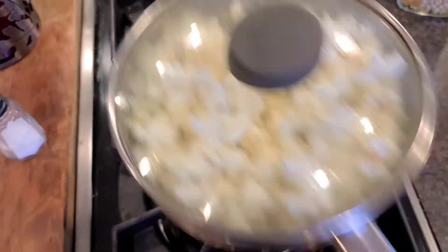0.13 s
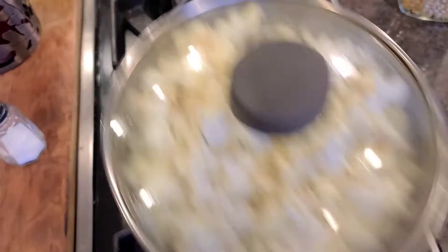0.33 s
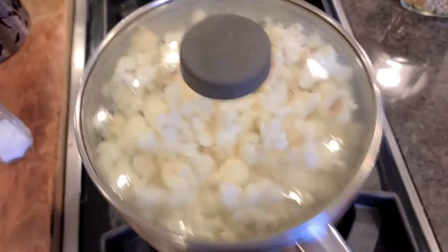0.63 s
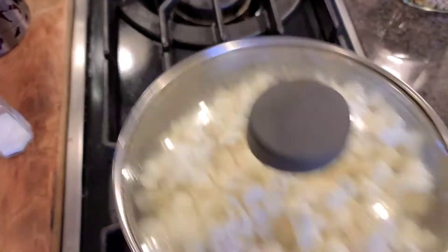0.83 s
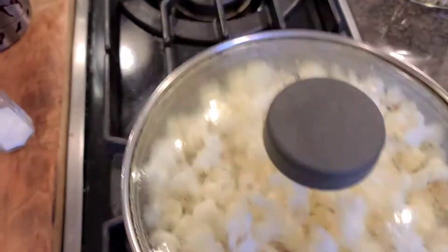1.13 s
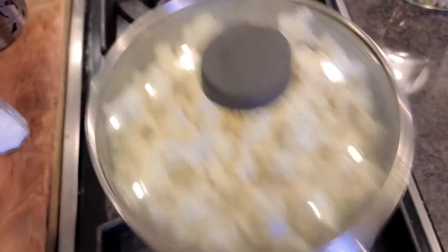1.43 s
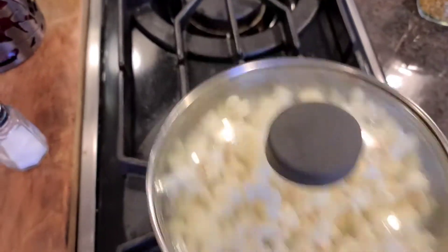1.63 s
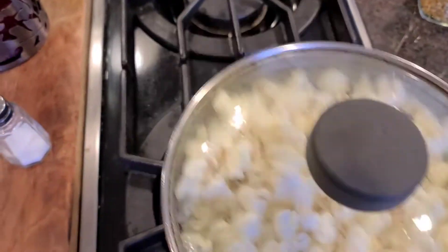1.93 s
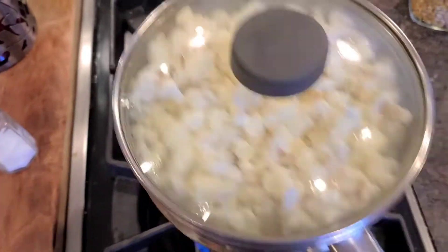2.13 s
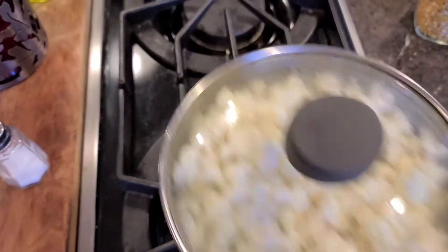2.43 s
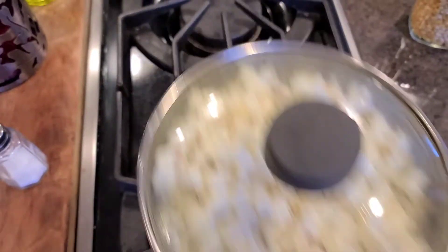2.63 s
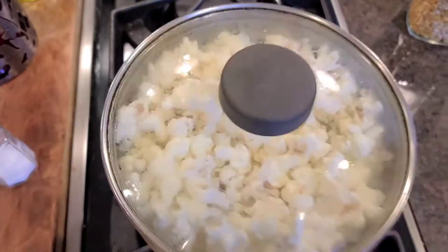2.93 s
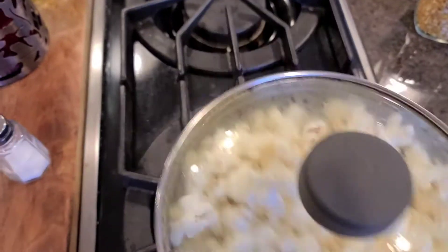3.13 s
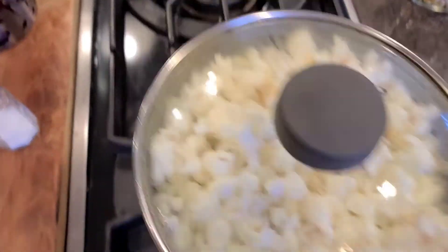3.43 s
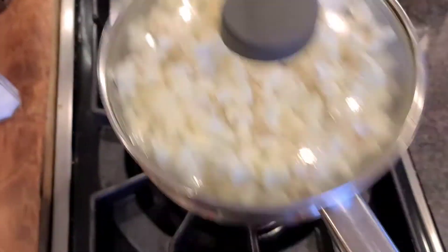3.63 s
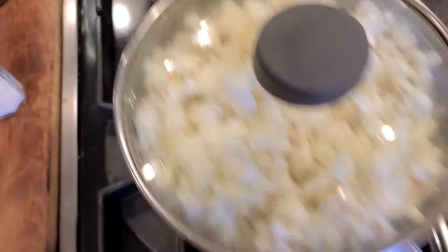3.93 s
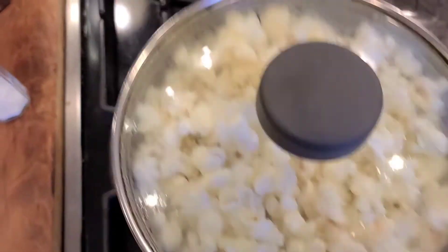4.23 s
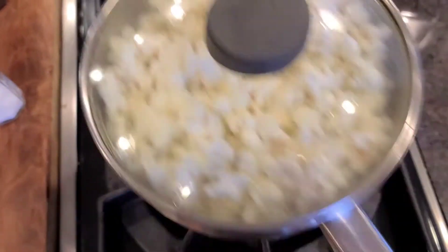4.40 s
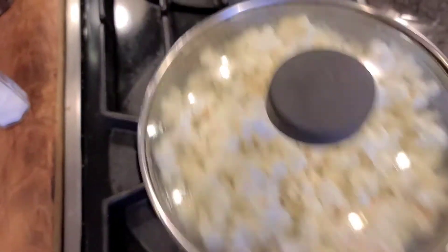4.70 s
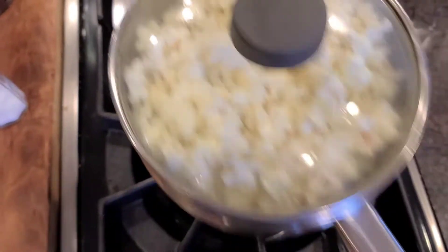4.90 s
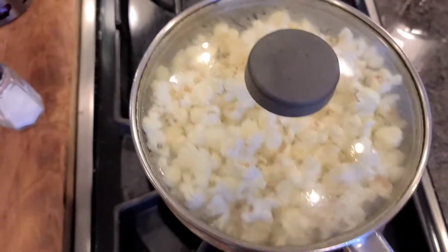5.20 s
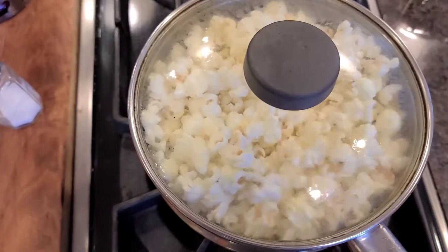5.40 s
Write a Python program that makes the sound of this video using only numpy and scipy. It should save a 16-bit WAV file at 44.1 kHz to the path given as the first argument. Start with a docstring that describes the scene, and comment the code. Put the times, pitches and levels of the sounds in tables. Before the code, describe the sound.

From the start, a steel pot is shaken to and fro on an iron stove grate in a quick, nearly even rhythm of about five knocks a second. Each stroke is a short scrape into a ringing metal clatter, with a hollow boom from the stove top. A loose glass lid clinks just before every second knock, growing softer over time. Popcorn kernels burst irregularly among the knocks with sharp cracks and small thumps, thickest and loudest between 1 and 1.7 seconds, sparser later. Oil sizzles faintly, swelling at about 0.3 seconds and again around 2.1 seconds, when a thin hiss of steam escapes. The shaking ends just after 5 seconds. A few last kernels pop until about 5.4 seconds, one pinging brightly on the pot wall. A gas flame rushes quietly throughout. Everything sounds close, with the short reverberation of a small kitchen.

```python
"""Shaking popcorn on a gas stove

A steel pot is shaken to and fro on an iron grate. About five times a second it scrapes, knocks and
rings, and the stove top booms; the loose glass lid clinks just before every second knock. Kernels
crack and thump in between, oil sizzles, steam slips out, the burner rushes and a small kitchen answers.
"""
import sys
import numpy as np
from scipy import signal
from scipy.fft import rfft, irfft
from scipy.io import wavfile
from scipy.ndimage import uniform_filter1d

SR = 44100
rng = np.random.default_rng(int(sys.argv[2]) if len(sys.argv) > 2 else 0)


def to_wav(s):
    """Save 16-bit WAV."""
    ch = np.atleast_2d(s).T  # columns
    pcm = np.round(np.clip(ch, -1, 1) * 32767)  # PCM
    wavfile.write(sys.argv[1], SR, pcm.astype(np.int16))


N = 245061
BLOW = np.arange(12288) / SR  # time within one blow [s]
RELEASE = 1 - (BLOW / BLOW[-1]) ** 4  # smooth end for a blow
SIDES = np.array([[.5], [-.5]])  # splits a difference between left and right

# pot hitting the grate: (time [s], clatter [dB], boom [dB], t60 [s], contact resonance [Hz])
KNOCKS = [(0.0304, -15.5, -24, 0.1, 1820), (0.254, -15.5, -21.5, 0.12, 2760),
          (0.4425, -14.5, -25.5, 0.1, 2950), (0.6505, -14, -17, 0.13, 2780),
          (0.814, -16, -17.5, 0.13, 1650), (1.006, -15, -16, 0.14, 2800), (1.1715, -16.5, -19, 0.17, 2130),
          (1.388, -15.5, -20.5, 0.13, 2740), (1.576, -17.5, -31, 0.2, 2770),
          (1.7996, -14, -19, 0.077, 2830), (1.9921, -15, -28, 0.065, 2020), (2.1971, -15, -23, .12, 3470),
          (2.3652, -18, -21.5, 0.15, 930), (2.576, -16, -17.5, 0.11, 1500), (2.7606, -14, -26.5, .1, 2040),
          (2.966, -15.5, -16.5, .12, 2740), (3.1362, -14.5, -19.5, 0.16, 2500),
          (3.342, -16.5, -17, 0.15, 1600), (3.511, -14, -16.5, 0.18, 3650), (3.724, -16, -18, .11, 2840),
          (3.897, -14, -21.5, .11, 2220), (4.1067, -15.5, -19, .11, 1435), (4.2738, -18, -18.5, 0.15, 1940),
          (4.4851, -15, -21, .15, 2740), (4.6662, -18.5, -25, 0.1, 1965), (4.8795, -16.5, -20.5, .12, 2800),
          (5.0557, -13, -17.5, 0.089, 1960)]
# modes of the glass lid: (frequency [Hz], level [dB], t60 [s])
LID_MODES = [(1400, -20, 0.25), (1745, -0.5, 0.095), (1664, -6.5, 0.14), (2613, -11, 0.24),
             (2728, -4.5, 0.089), (3320, -6, 0.12), (6250, -26, 0.11)]
# modes of the stove top: (frequency [Hz], level [dB], t60 [s])
STOVE_MODES = [(179.6, -9, 0.093), (219.6, -3, 0.1), (267.8, -8, 0.16), (324.6, -3.5, 0.11),
               (410.2, -8.5, 0.086)]
# how alike left and right are: (frequency [Hz], coherence [0-1])
COHERENCE = [(100, .98), (350, .96), (600, .7), (1200, .5), (5000, .45), (14000, .3)]


def knocks():
    """The pot slides, hits the grate and rebounds: clatter, ringing steel and a stove-top boom."""
    # modes of the steel pot: (frequency [Hz], level [dB], t60 [s])
    pot_modes = [(1710, -26, 0.2), (2090, -13.5, 0.2), (2073, -20.5, 0.29), (2640, -23.5, 0.53),
                 (2700, -14, 0.13), (2670, -29, 0.67), (2660, -18, 0.2), (3653, -2.5, 0.043),
                 (5990, -11, 0.091), (6080, -10.5, 0.12), (7100, -17.5, 0.11)]
    # tone of steel on iron: (frequency [Hz], relative level [dB])
    colour = [(150, -12.5), (400, -3), (550, -11), (700, -5), (1000, -2.5), (1650, 0), (2300, -3.5),
              (2750, -3), (3100, -3), (3600, -5.5), (5200, -0.5), (6100, -1.5), (9800, -8), (14000, -8.5)]
    # the two stroke directions: (thump [Hz], push [dB re clatter], scrape [dB re clatter])
    strokes = [(231, -8.5, -12), (228.2, -18.5, -16.5)]
    treble_db, rebound_s, rebound_db = -9, 0.025, -11.5
    out = np.zeros((2, N))
    for k, (s, db, boom_db, t60, contact_hz) in enumerate(KNOCKS):
        thump_hz, push_db, scrape_db = strokes[k % 2]
        metal = amp(2) * clatter(colour, treble_db, t60, snap=1, lumpy_db=2.5,
                                 contact_hz=contact_hz, contact_db=7, bounces=3)
        metal += amp(1) * ring(pot_modes, uneven_db=2.5, detune=0.004)
        boom = amp(2.5) * ring(STOVE_MODES, uneven_db=1.5, detune=0.028, rise=0.0014)
        boom += amp(0.5) * thump(thump_hz, t60=0.13, rise=0.0044)
        metal += amp(-7.5) * tick(t60=0.0068)  # first touch of steel on iron
        add(out, s, amp(db) * (metal + amp(push_db) * push()) + amp(boom_db) * boom)
        rebound = clatter(colour, treble_db, t60=0.051, snap=0.53, lumpy_db=1)
        add(out, s + rebound_s, amp(db + rebound_db) * rebound)
        add(out, s - BLOW[-1], amp(db + scrape_db) * scrape())
    return out


def pops():
    """A hull cracks, its steam thumps the air in the pot, and the kernel strikes the lid."""
    # bursting kernels: (time [s], crack [dB], treble [dB re crack], thump [dB], thump pitch [Hz])
    kernels = [(0.0236, -21, -27, -27.5, 406), (0.1353, -20, -4, -21, 315), (0.1894, -27.5, 3.5, -25, 280),
               (0.3573, -28, 2.5, -33, 335), (0.4265, -24, 3.5, -26, 412), (0.4872, -18, -1.5, -30.5, 258),
               (0.543, -47, 14, -47, 350), (0.9712, -21, -8, -33, 292), (1.1179, -19.5, -8.5, -25.5, 263),
               (1.1545, -17.5, -8.5, -25.5, 392), (1.2052, -17.5, -6.5, -15.5, 347),
               (1.533, -22.5, -7, -25.5, 303), (1.5678, -20.5, -4, -19.5, 271),
               (1.633, -22.5, 1.5, -21.5, 207), (1.6987, -13.5, -15, -20, 416),
               (1.7072, -11.5, -5, -18.5, 200), (1.858, -21.5, -5.5, -28, 356),
               (1.9868, -21.5, -13, -23.5, 338), (2.089, -37, -2, -33, 296), (2.1284, -50.5, 17, -55, 290),
               (2.2525, -20.5, -1.5, -25, 314), (2.4823, -30, -8, -34, 302), (2.533, -18, -0.5, -25.5, 287),
               (3.0648, -18.5, -3.5, -19.2, 344), (3.1958, -23, 5, -28.5, 340),
               (3.5758, -19.5, -6, -29, 317), (3.653, -19.5, -3, -26.5, 240), (3.8319, -24, -5.5, -23, 376),
               (4.0942, -23, -2, -25, 371), (4.3427, -29.5, -1, -20.5, 217),
               (5.0273, -14.5, -10, -20.5, 359), (5.227, -21, -12, -16, 318), (5.267, -19.5, 0, -17, 367),
               (5.4105, -21, -8, -19.5, 376)]
    # tone of the crack: (frequency [Hz], relative level [dB])
    colour = [(150, -67.5), (400, 11.5), (560, 3.5), (880, 6), (1400, 9.5), (1700, 6), (2200, 4),
              (2750, 4.5), (3100, 0.5), (3600, 4), (5000, 2), (7500, 3.5), (10000, -5.5), (14000, -3.5)]
    out = np.zeros((2, N))
    for s, db, treble_db, thump_db, thump_hz in kernels:
        lid_hz = 1532 * np.exp(0.1 * rng.standard_normal())  # all strike near one lid resonance
        t60 = 0.092 * 2 ** (-treble_db / 18)  # the brighter the crack, the shorter
        crack = amp(-2.5) * clatter(colour, treble_db, t60, snap=1.9, lumpy_db=1.5, contact_hz=lid_hz,
                                    contact_db=7, contact_width=0.039, treble_life=0.89)
        crack += amp(-4) * ring(LID_MODES, uneven_db=2.5, detune=0.01)
        crack += amp(treble_db - 9) * tick(t60=0.012)  # the hull's first snap
        air = amp(5.5) * thump(thump_hz, t60=0.079, rise=0.00067)
        stove = amp(-3) * ring(STOVE_MODES, uneven_db=4.5, detune=0.032, rise=0.00048)
        pop = amp(db) * (crack + amp(-2.5) * push()) + amp(thump_db) * (air + stove)
        add(out, s, place_in_pot(pop))
    return out


def clinks(lead_s=0.029):
    """The loose lid meets the rim before every second knock, more softly as it settles."""
    # tone of glass on the rim: (frequency [Hz], relative level [dB])
    colour = [(100, 6.5), (320, 7), (550, -10), (750, 10.5), (1350, 5.5), (1750, -4), (2200, -10),
              (2750, -6), (3800, -10.5), (7000, -12), (10000, -26), (14000, -27)]
    out = np.zeros((2, N))
    for s, *_ in KNOCKS[1::2]:
        touch = amp(-3.5) * clatter(colour, treble_db=-10.5, t60=0.065, snap=0.84, lumpy_db=6)
        glass = ring(LID_MODES, uneven_db=2.5, detune=0.004) * fade(BLOW, 0.46)  # damped by the rim
        add(out, s - lead_s, amp(-22 - 1.5 * s) * (touch + glass))
    return out


def ping(at_s=5.269):
    """One hard kernel strikes the thin steel wall, which rings brightly."""
    # modes of the pot wall: (frequency [Hz], level [dB], t60 [s])
    wall_modes = [(3376, -2, 0.16), (4400, -7.5, 0.18), (4650, -13, .13), (5286, -10, 0.19),
                  (6200, -9, 0.2), (7060, -6, 0.11), (7560, -1, 0.11)]
    out = np.zeros((2, N))
    add(out, at_s, amp(-19) * ring(wall_modes, uneven_db=0.5, detune=0.0003, rise=0.004, blur=0.002))
    return out


def clatter(colour, treble_db, t60, snap, lumpy_db, contact_hz=2000, contact_db=0, contact_width=0.053,
            treble_life=0.81, bounces=0):
    """A sharp contact, then a dense, uneven scatter of short rings and bounces."""
    hz = bins(len(BLOW))
    lumps = amp(lumpy_db * unit(uniform_filter1d(rng.standard_normal(len(BLOW)), size=130)))
    # a heavy body bounces a few milliseconds apart
    since_bounce = BLOW - np.cumsum(rng.uniform(0.003, 0.009, bounces))[:, None]
    lumps *= 1 + 1.3 * ((since_bounce > 0) * fade(abs(since_bounce), 0.009)).sum(0)
    decay = fade(BLOW, t60)
    envelope = unit(lumps * decay) * np.sqrt(np.mean(decay ** 2)) + snap * fade(BLOW, 0.001)
    noise = stereo_noise(len(BLOW))
    # the treble starts stronger and dies sooner
    shelf = np.clip((hz - 3500) / 2000, 0, 1)
    treble = equalise(noise, shelf)
    treble_decay = fade(BLOW, t60 * treble_life / (1 - treble_life)) / np.sqrt(treble_life)
    scatter = envelope * (noise - treble + treble * treble_decay)
    # the struck spot favours one resonance and reweights the crowded upper modes
    resonance = np.exp(-(np.log((hz + 1) / contact_hz) / contact_width) ** 2)
    ripple = unit(signal.oaconvolve(rng.standard_normal(len(hz)), np.hanning(64), "same"))
    gain_db = curve(colour, hz) + contact_db * resonance + 3.5 * ripple * hz / (hz + 2000)
    # normalise the mids and set the top band treble_db from them
    mids, top = (hz > 700) & (hz < 4500), (hz > 5000) & (hz < 14500)
    mids_db, top_db = (10 * np.log10(np.mean(amp(gain_db) ** 2 * band)) for band in (mids, top))
    return tint(scatter, gain_db - mids_db + shelf * (treble_db - top_db + mids_db)) * RELEASE


def ring(modes, uneven_db, detune, rise=0.00022, blur=0.0078):
    """Decaying modes; every blow shares its energy among them differently."""
    hz, db, t60 = np.transpose(modes)[:, :, None]
    strength, shift, side = rng.standard_normal((3, len(hz), 1))
    phase = 2 * np.pi * (hz * (1 + detune * shift) * BLOW + rng.random((len(hz), 1)))
    # shifting contacts make each mode wander, widening it by the fraction blur
    phase += np.sqrt(2 * np.pi * blur * hz / SR) * np.cumsum(rng.standard_normal(phase.shape), 1)
    spread = side * np.arccos(np.clip(curve(COHERENCE, hz), 0, 1)) / 2
    envelope = amp(db + uneven_db * strength) * fade(BLOW, t60) * (1 - np.exp(-BLOW / rise)) * RELEASE
    return np.array([(envelope * np.sin(phase + way * spread)).sum(0) for way in (1, -1)])


def tick(t60):
    """The first instant of a blow: a very short, bright burst."""
    band = signal.butter(1, [2500, 12000], "bandpass", fs=SR, output="sos")
    return signal.sosfilt(band, stereo_noise(len(BLOW)) * fade(BLOW, t60))


def thump(hz, t60, rise):
    """One low, quickly damped swing."""
    return np.sin(2 * np.pi * hz * BLOW) * fade(BLOW, t60) * (1 - np.exp(-BLOW / rise))


def push(t60=0.063):
    """The heavy, slow give of the whole stove."""
    low_hz, high_hz = rng.uniform(0.76, 1.465, 2) * [66, 106]
    return 0.3 * thump(low_hz, t60, rise=0.0017) + thump(high_hz, t60, rise=0.0014)


def scrape(t60=0.064, centre_hz=1150, q=2.3):
    """The pot's base drags on the iron, swelling up to the blow."""
    hz = bins(len(BLOW)) + 1
    band_db = -10 * np.log10(1 + (q * (hz / centre_hz - centre_hz / hz)) ** 2)
    return unit(tint(stereo_noise(len(BLOW)), band_db)) * fade(BLOW[::-1], t60)


def place_in_pot(pop, spread_s=0.00007, spread_db=1.5):
    """A kernel bursts anywhere in the pot: a random left-right delay and balance."""
    lead, pan = rng.standard_normal(2)
    delay_s = 0.0003 - spread_s * lead * SIDES
    delayed = equalise(pop, np.exp(-2j * np.pi * bins(len(BLOW)) * delay_s))
    return delayed * amp(spread_db * pan * SIDES) * RELEASE


def sizzle(bursts_per_s=2000):
    """Countless tiny bursts of oil and brushing flakes, a few of them larger."""
    # swell of the hot oil: (time [s], level [dB])
    levels = [(0, -47), (.33, -44.5), (.95, -62), (1.5, -55), (2.1, -44), (2.4, -55), (3.3, -58),
              (3.701, -60), (4.2, -58), (5.55, -60)]
    # tone of the sizzle: (frequency [Hz], relative level [dB])
    colour = [(500, -23), (2500, 4), (6300, 4.5), (10000, -3.5), (13500, -0.5)]
    sizes = amp(4 * np.minimum(rng.exponential(1, N), 4.5))
    bursts = sizes * (rng.random(N) < bursts_per_s / SR)
    power = signal.oaconvolve(bursts ** 2, fade(BLOW, 0.004))[:N]
    fizz = stereo_noise(N) * np.sqrt(abs(power))
    level_db = np.interp(np.arange(N) / SR, *np.transpose(levels))
    return amp(level_db) * unit(equalise(fizz, amp(curve(colour, bins(N)))))


def steam(peak_s=2.1, half_length_s=0.2, centre_hz=13000, half_width_hz=2000):
    """A puff slips out under the lid: a thin, high hiss that swells and dies away."""
    swell = np.exp(-((np.arange(N) / SR - peak_s) / half_length_s) ** 2)
    band = np.exp(-((bins(N) - centre_hz) / half_width_hz) ** 2)
    return amp(-52) * swell * unit(equalise(stereo_noise(N), band))


def burner():
    """The steady rush of the gas flame."""
    # tone of the flame: (frequency [Hz], relative level [dB])
    colour = [(15, -48), (25, 7), (213, -4), (318, 10.5), (554, -0.5), (1730, -1), (2310, 0.5), (2640, -9),
              (3010, -2.5), (5690, -20), (6160, -43), (10200, -37.5), (14000, -79)]
    return amp(-48) * unit(equalise(stereo_noise(N), amp(curve(colour, bins(N)))))


def kitchen(x, build_s=0.017):
    """A diffuse tail that builds up quickly and dies at its own speed in each band."""
    # decay of the room: (frequency [Hz], t60 [s], floored at 1 ms by fade)
    decays = [(80, 2), (250, 0.46), (600, 0.4), (2500, 0.36), (6000, 0.8), (14000, -0.2)]
    # tone of the tail: (frequency [Hz], level [dB])
    colour = [(80, -9.5), (250, -20), (600, -17), (2500, -21.5), (6000, -19), (14000, -11)]
    hz, t, spectra = signal.stft(stereo_noise(SR), SR, nperseg=512)
    envelope = fade(t, curve(decays, hz)[:, None]) * (1 - np.exp(-t / build_s))
    envelope *= amp(curve(colour, hz))[:, None] / np.sqrt(SR * np.mean(envelope ** 2, 1, keepdims=True))
    tail = signal.istft(spectra * envelope, SR, nperseg=512)[1]
    return signal.fftconvolve(x, tail, axes=1)[:, :N]


def stereo_noise(size):
    """White noise, nearly mono in the bass and wide in the treble."""
    spectra = rfft(rng.standard_normal((2, size)))
    blend = np.arcsin(np.clip(curve(COHERENCE, bins(size)), 0, 1)) / 2
    return irfft(spectra * np.cos(blend) + spectra[::-1] * np.sin(blend), size)


def equalise(x, gain):
    """Applies a real or complex gain to every frequency bin."""
    return irfft(rfft(x) * gain, x.shape[1])


def tint(x, gain_db):
    """Minimum-phase EQ: nothing rings ahead of the attack."""
    log_gain = np.log(amp(gain_db))
    phase = -signal.hilbert(np.r_[log_gain, log_gain[-2:0:-1]]).imag[:len(log_gain)]
    return equalise(x, np.exp(log_gain + 1j * phase))


def amp(db):
    """Decibels to gain."""
    return 10 ** (np.asarray(db) / 20)


def unit(x):
    """Scales to rms 1."""
    return x / np.sqrt(np.mean(x ** 2) + 1e-20)


def curve(points, hz):
    """Joins (frequency, value) points on a log-frequency axis."""
    point_hz, values = np.transpose(points)
    return np.interp(np.log(hz + 1), np.log(point_hz + 1), values)


def bins(size):
    """Frequencies of a real spectrum."""
    return np.fft.rfftfreq(size, 1 / SR)


def fade(t, t60):
    """Exponential decay by 60 dB in t60."""
    return np.exp(-np.log(1000) * t / np.maximum(t60, 1e-3))


def add(mix, s, sound):
    """Mixes a stereo sound in at time s."""
    start = round(s * SR)
    sound = sound[:, max(-start, 0):]
    part = mix[:, max(start, 0):][:, :sound.shape[1]]
    part += sound[:, :part.shape[1]]


def scene():
    """The pot in the kitchen, over the burner; the reflections slowly drift."""
    pot = knocks() + pops() + clinks() + ping() + sizzle() + steam()
    drift = 2 * np.pi * 0.65 * np.arange(N) / SR  # sweeps between two room tails
    return pot + kitchen(pot * np.cos(drift)) + kitchen(pot * np.sin(drift)) + burner()


def record(dry, cutoff_hz=14800):
    """Two microphone ports of different colour and phase, a low cut, soft overload and a high cut."""
    # balance of the ports: (frequency [Hz], left minus right [dB])
    balance = [(100, 1), (250, 0.5), (430, -2), (800, 1), (1300, 1), (2100, 6.5), (2800, 6), (3500, 1.5),
               (4400, 3), (5600, 8), (7400, 15.5), (8700, 5.5), (10500, -3.5), (14000, 1)]
    # phase between the ports: (frequency [Hz], left lead [rad])
    lead = [(100, 0), (400, .2), (800, .9), (1500, 1.4), (4000, 1.65), (14000, 1.55)]
    hz = bins(N)
    tilt = amp(curve(balance, hz) * SIDES)
    ports = tilt / np.sqrt(np.mean(tilt ** 2, 0)) * np.exp(1j * curve(lead, hz) * SIDES)
    low_cut = signal.butter(3, 52, "highpass", fs=SR, output="sos")
    heard = signal.sosfilt(low_cut, equalise(dry, ports))
    saturated = 1.2 * np.tanh(heard / 1.2)
    high_cut = signal.firwin(255, cutoff_hz, window=("kaiser", 8), fs=SR)
    return signal.oaconvolve(saturated, high_cut[None], "same", axes=1)


dry = scene()
out = record(dry)
to_wav(out)
```